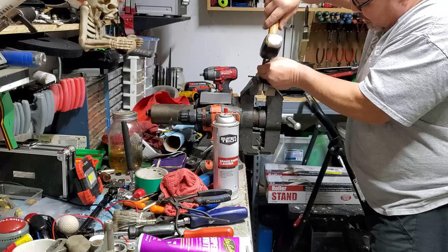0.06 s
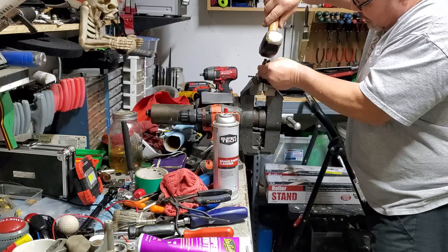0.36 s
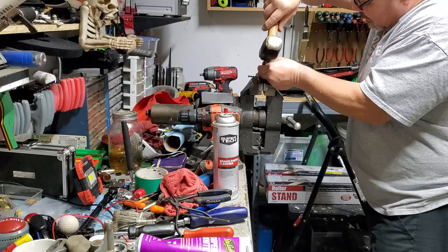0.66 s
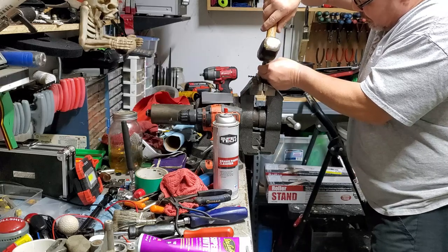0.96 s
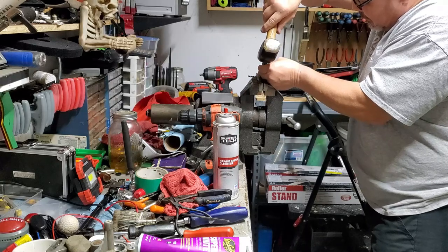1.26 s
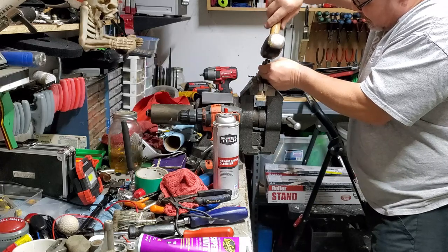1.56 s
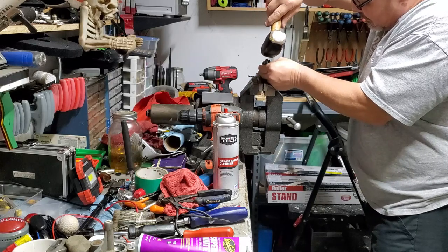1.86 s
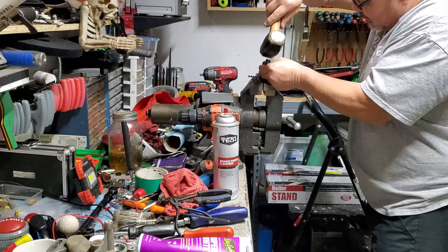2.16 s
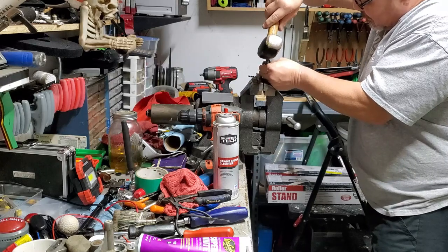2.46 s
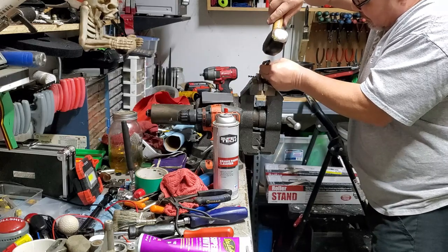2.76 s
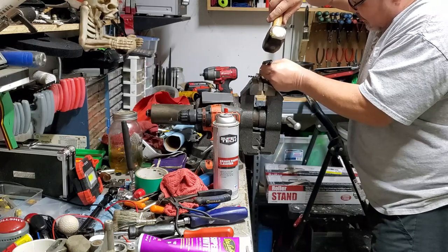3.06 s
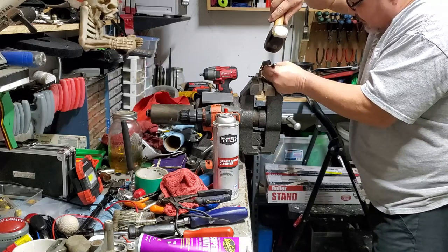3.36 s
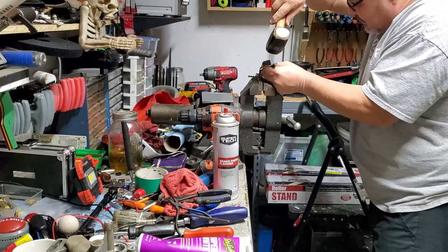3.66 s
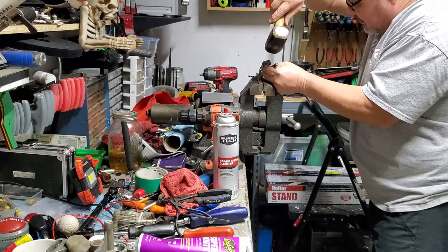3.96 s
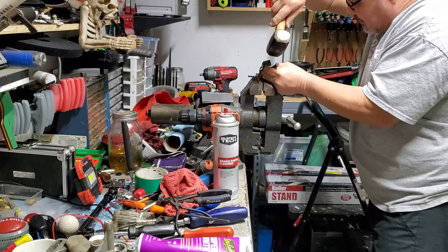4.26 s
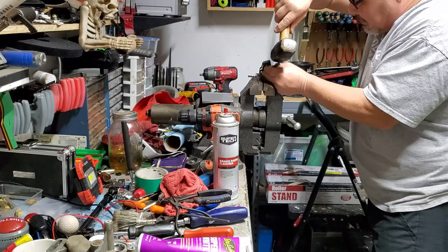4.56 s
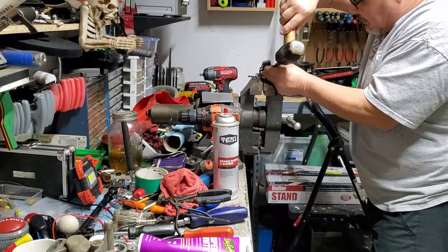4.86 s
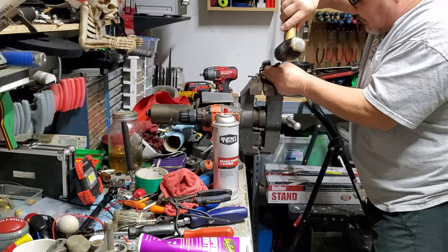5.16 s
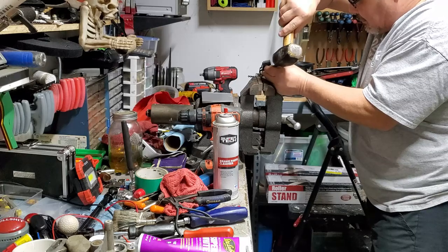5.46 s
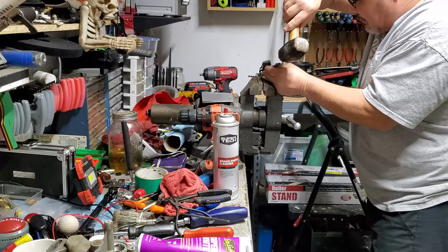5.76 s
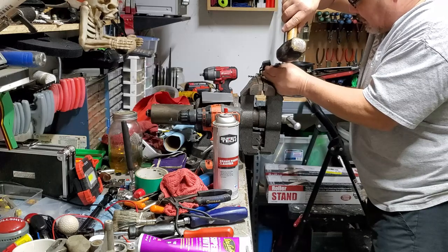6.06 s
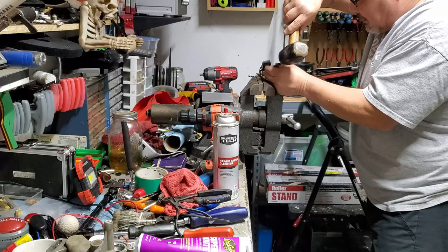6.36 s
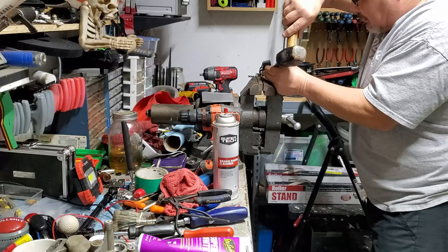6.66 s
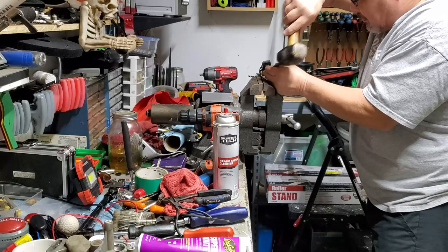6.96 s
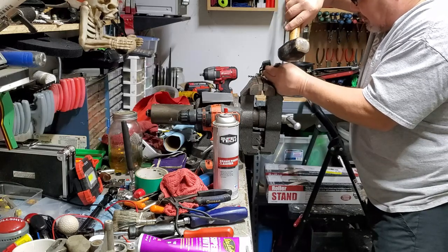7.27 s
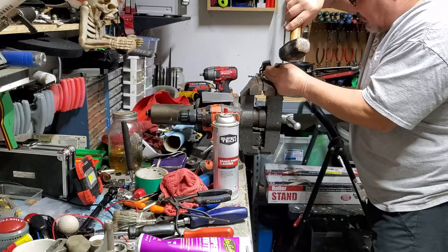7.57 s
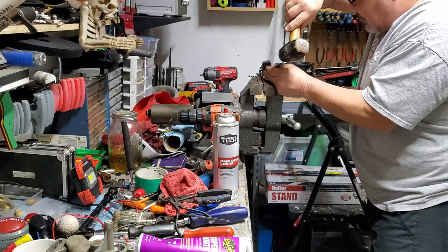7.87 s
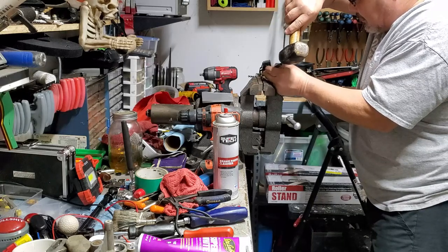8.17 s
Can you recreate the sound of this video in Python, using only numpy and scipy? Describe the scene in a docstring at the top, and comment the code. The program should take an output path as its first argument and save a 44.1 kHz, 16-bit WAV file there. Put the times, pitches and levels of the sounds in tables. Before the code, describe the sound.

A hammer taps a heavy metal housing clamped to a bench in a small workshop, heard in stereo from nearby. From about 0.2 to 2.4 seconds, seven sharp blows land evenly, nearly three a second. Each cracks, rings briefly, thumps the bench and lightly rattles loose tools, with a short room echo. A pause follows, with faint clinks of handled metal around 2.7, 3.2 and 4.6 seconds. At 5 and 5.5 seconds come two duller knocks, each with a high ping, followed by more small clinks. A weak tap lands at 6.6 seconds and a hard, ringing blow at 7. One last tiny clink comes near 7.8 seconds. Underneath throughout are quiet room air, a low motor hum and a faint distant drone that swells slightly between 5 and 6.5 seconds.

```python
"""A small, crowded workshop, heard through a stereo microphone near the bench.
Over room air, a motor's hum and a far-off drone, a hammer taps a heavy metal housing clamped to the bench.
Seven quick blows come first: each cracks, rings the housing, thumps the bench and shakes loose tools,
and the room answers. In the pause the metal clinks faintly in the hand and a thin whine comes and goes.
From 5 s four more blows follow, unevenly spaced, the third one weak; a last faint clink ends the work."""
import sys
import numpy as np
from scipy import signal
from scipy.fft import rfft, irfft, next_fast_len
from scipy.io import wavfile
from scipy.ndimage import map_coordinates

SR = 44100
rng = np.random.default_rng(int(sys.argv[2]) if len(sys.argv) > 2 else 0)


def int16_out(signal):
    """Quantize to a 16-bit WAV file."""
    q = np.round(np.clip(np.atleast_2d(signal).T, -1, 1) * 32767)
    wavfile.write(sys.argv[1], SR, q.astype(np.int16))


N = 362943
T = np.arange(int(.6 * SR)) / SR  # time within one impact [s]

# hammer blows: (time [s], force [dB], clang over the force [dB], ping pitch [Hz], ping level [dB])
BLOWS = [(.1580, -1, -3.5, 3730, -3.5), (.5343, -.5, -7.5, 3720, -5), (.9303, 1, -2, 3730, 1.5),
         (1.2903, 0.5, -4, 3746, 7.5), (1.6796, 1, -1.5, 3670, 3), (2.0432, 1, -2, 2914, 2.5),
         (2.4, 1.5, -3.5, 3736, -2), (5.0057, -1.5, -19.5, 5040, -2), (5.4844, 2.5, -21, 5100, 1.5),
         (6.5559, -20.5, -4.5, 3506, -10), (7.0452, 4, -8.5, 4197, 7)]
# modes of the bench and vise: (frequency [Hz], energy [dB], t60 [s])
BENCH_MODES = [(181.7, -10, 0.16), (217.4, -6.5, .24), (258, -19, .28), (324, -3.5, 0.17), (350.8, -7, .42),
               (459.5, 3.5, 0.2), (557.1, -7.5, 0.16), (624, -4, 0.079), (712, -5.5, .16), (830, -7, 0.067),
               (1045.4, -7.5, 0.12)]
# the dry knock of the whole assembly: (frequency [Hz], level [dB])
KNOCK_SPECTRUM = [(60, -18.5), (200, -3), (480, 1), (1000, -3.5), (1650, -8), (2700, -4), (5200, -11),
                  (7000, -14), (9200, -25), (11000, -23), (13500, -24), (15500, -23)]
# the room's echoes at the microphone: (frequency [Hz], left-right likeness [-1..1])
ECHO_LIKENESS = [(150, 0.94), (400, 0.46), (900, 0.061), (3000, 0.13)]


def amp(db):
    """Decibels to gain."""
    return 10 ** (np.asarray(db) / 20)


def unit(x):
    """Scaled to rms 1."""
    return x / np.sqrt(np.mean(x ** 2) + 1e-20)


def unit_energy(x):
    """Scaled to a mean energy of 1 per channel."""
    return unit(x) / np.sqrt(x.shape[-1])


def along(points, hz):
    """(Hz, value) points read on a log axis."""
    freqs, values = np.transpose(points)
    return np.interp(np.log(hz + 1), np.log(freqs + 1), values)


def curve(points):
    """(s, value) points read at every sample."""
    return np.interp(np.arange(N) / SR, *np.transpose(points))


def wobble(rate):
    """A smooth random curve, rate knots a second."""
    return map_coordinates(rng.standard_normal(int(N * rate / SR) + 4), [np.arange(N) * rate / SR])


def tone(hz, waver_hz, waver_rate=12):
    """An unsteady sine of rms 1."""
    return unit(np.sin(2 * np.pi * np.cumsum(hz + waver_hz * wobble(waver_rate)) / SR))


def swelling(rows, fade_s):
    """A gain that fades in, holds and fades out for each (time [s], length [s], level [dB]) row."""
    t = np.arange(N) / SR
    return sum(amp(db) * np.clip(np.minimum(t - s, s + length - t) / fade_s, 0, 1)
               for s, length, db in rows)


def filtered(x, response):
    """x times a response of frequency."""
    n = x.shape[-1]
    size = next_fast_len(n + 8192)
    return irfft(rfft(x, size) * response(np.fft.rfftfreq(size, 1 / SR)), size)[..., :n]


def coloured(x, spectrum):
    """x through a causal (minimum-phase) filter with these (Hz, dB) points."""
    size = 2 * next_fast_len(x.shape[-1])
    gain = amp(along(spectrum, np.fft.rfftfreq(size, 1 / SR)))
    cepstrum = irfft(np.log(gain), size)
    cepstrum[1:size // 2] *= 2
    cepstrum[size // 2 + 1:] = 0
    return irfft(rfft(x, size) * np.exp(rfft(cepstrum)), size)[..., :x.shape[-1]]


def noise_pair(size=len(T), likeness=ECHO_LIKENESS):
    """White stereo noise with a given likeness of the channels."""
    def mid_side_gains(hz):
        angle = np.arccos(np.clip(along(likeness, hz), -1, 1)) / 2
        return np.array([np.cos(angle), np.sin(angle)])
    mid, side = filtered(rng.standard_normal((2, size)), mid_side_gains)
    return np.array([mid + side, mid - side])


def add(track, s, sound):
    """Mix a sound into the track at s seconds."""
    part = track[:, max(round(s * SR), 0):][:, :sound.shape[-1]]
    part += sound[:, :part.shape[-1]]


def ring(modes, rise_s, scatter_db, lag_s):
    """Decaying modes at fresh strengths, their phase lag_s earlier on the left than on the right."""
    out = np.zeros((2, len(T)))
    for hz, db, t60 in modes:
        t = T[T < 1.5 * t60]
        phase = rng.uniform(0, 2 * np.pi) + np.array([[1], [-1]]) * np.pi * hz * lag_s
        envelope = amp(-60 * t / t60) * (1 - np.exp(-t / rise_s))
        mode = unit_energy(np.sin(2 * np.pi * hz * t + phase) * envelope)
        out[:, :len(t)] += amp(db + scatter_db * rng.normal()) * mode
    return out


def wash(noise, spectrum, rise_s):
    """Countless modes and echoes, each frequency dying at its own speed."""
    # decay of the small room: (frequency [Hz], t60 [s])
    room_t60 = [(150, 0.46), (800, 0.35), (3000, 0.29), (7000, .3), (10000, .22), (15000, .21)]
    hz, t, bands = signal.stft(noise, SR, nperseg=256)
    decay = amp(-60 * t / along(room_t60, hz)[:, None])
    tail = signal.istft(bands * decay, SR, nperseg=256)[1][:, :len(T)]
    return unit_energy(coloured(tail * (1 - np.exp(-T / rise_s)), spectrum))


def room_tone(air_db=-58, hiss_db=-77.3):
    """The steady low air of the workshop under a faint hiss."""
    # room air: (frequency [Hz], relative level [dB])
    air = [(12, -58), (20, -23), (43, -11.5), (65, -18), (86, -9), (120, -11), (149, -19.5), (188, -16.5),
           (265, -17), (312, -20.5), (1500, -41), (1950, -75.5), (3300, -120)]
    # hiss: (frequency [Hz], relative level [dB])
    hiss = [(900, -15), (1700, 1), (3000, 1), (3850, 1.5), (5000, -4), (6500, 0), (8800, -14), (11000, -14),
            (12500, -6), (15700, -6)]
    # both at the microphone: (frequency [Hz], left-right likeness [-1..1])
    likeness = [(60, 0.32), (240, -0.14), (950, -0.23), (3770, 0.87), (15000, -0.01)]
    def steady(spectrum):
        return unit(filtered(noise_pair(N, likeness), lambda hz: amp(along(spectrum, hz))))
    return amp(air_db) * steady(air) + amp(hiss_db) * steady(hiss)


def motor_hum(hz=58.8, level_db=-54):
    """A motor hums low, its level and pitch wavering."""
    return amp(level_db + 2.5 * wobble(18)) * tone(hz, waver_hz=2.5)


def far_drone(gain_db=-1, upper_ratio=1.37, upper_db=-4, swell_hz=157):
    """Two far-off tones drop once in pitch and climb back; a lower one swells twice within them."""
    # the lower of the two tones: (time [s], frequency [Hz])
    pitch = [(3.3, 188), (4.2, 193), (4.6, 178), (5.6, 185), (6.1, 194)]
    # the drone's rise and fall: (time [s], level [dB])
    levels = [(0.0, -68), (2.34, -59), (2.84, -71), (3.71, -59.5), (4.24, -65), (5.09, -55), (5.87, -54),
              (6.21, -59.5), (8.23, -67.5)]
    # the low swells: (time [s], length [s], level [dB])
    swells = [(6.13, 0.42, -50), (7.74, 0.37, -65.5)]
    lower_hz = curve(pitch)
    tones = tone(lower_hz, waver_hz=2) + amp(upper_db) * tone(upper_ratio * lower_hz, waver_hz=4)
    drone = amp(gain_db + curve(levels) + 1.5 * wobble(8)) * tones
    return drone + swelling(swells, fade_s=.097) * tone(swell_hz, waver_hz=.67)


def whine(hz=3900):
    """A thin, fuzzy high tone comes and goes at the edge of hearing."""
    # spells of the whine: (time [s], length [s], level [dB])
    spells = [(4.35, .33, -85), (7.35, 0.39, -82.5)]
    fuzzy = tone(hz, waver_hz=70, waver_rate=300)
    return swelling(spells, fade_s=.083) * amp(2.24 * wobble(25)) * fuzzy


def hand_clinks(gain_db=15, ring_hz=2120, detune=.07, ring_db=-11, t60=.12, chink_hz=5250, bench_db=-6):
    """Metal shifts in the hand: each touch knocks and clinks in its own proportions."""
    # light touches of metal on the housing: (time [s], relative level [dB], high chink [dB])
    touches = [(1.588, -45.5, -20.5), (2.685, -44.5, -18.5), (2.724, -47.5, 0), (3.238, -44.5, -20),
               (4.585, -43, -13.5), (4.709, -49.5, -14), (5.324, -51, -18), (5.743, -49, -18.5),
               (5.945, -42.5, -8.5), (7.788, -53, -18)]
    out = np.zeros((2, N))
    for s, db, chink_db in touches:
        clink = wash(noise_pair(), KNOCK_SPECTRUM, rise_s=.00092) * amp(-60 * T / .5)
        hz = ring_hz * np.exp(detune * rng.normal())  # each touch lands on another spot
        modes = [(hz, ring_db, t60), (chink_hz, chink_db, t60)]
        clink += ring(modes, rise_s=.001, scatter_db=3, lag_s=.0001)
        clink += amp(bench_db) * ring(BENCH_MODES, rise_s=.004, scatter_db=2, lag_s=.0005)
        add(out, s, amp(db + gain_db) * coloured(clink, [(5500, 1), (12000, -11)]))
    return out


def tool_rattle(gain_db=-20, delay_s=(.11, .19), fade_db_per_s=55, detune=.035, contacts=7):
    """Tools lying on the bench jump at each blow and settle in small, unlike contacts."""
    # modes of the loose tools: (frequency [Hz], energy [dB], t60 [s])
    tool_modes = [(760, -7, .13), (1340, -7, .1), (2100, -1, .13), (3100, -5, .12), (4100, -10, .12)]
    out = np.zeros((2, N))
    for s, force_db, clang_db, *_ in BLOWS:
        for delay in rng.uniform(*delay_s, contacts):
            modes = [(hz * np.exp(detune * rng.normal()), db, t60) for hz, db, t60 in tool_modes]
            contact = ring(modes, rise_s=.00084, scatter_db=3.5, lag_s=.00019)
            level_db = gain_db + force_db + clang_db / 2 - fade_db_per_s * delay
            add(out, s + delay, amp(level_db) * contact)
    return out


def echoes(paths, shared=.75):
    """Echo noise, much the same for every blow: the fixed paths plus a fresh part."""
    return np.sqrt(shared) * paths + np.sqrt(1 - shared) * noise_pair()


def bench_knock(room_paths, clutter_paths, force_db, clang_db, wash_db=5, snap_db=3, snap_t60=.07):
    """Hammer head and bench knock together; the first echoes snap back from the clutter on the bench."""
    # modes of the steel hammer head: (frequency [Hz], energy [dB], t60 [s])
    head_modes = [(10560, -23, .12), (14490, -21, .1), (14638, -20, .23)]
    knock = amp(wash_db) * wash(echoes(room_paths), KNOCK_SPECTRUM, rise_s=.00082)
    snap = echoes(clutter_paths) * amp(-60 * T / snap_t60)
    knock += amp(snap_db) * unit_energy(coloured(snap, KNOCK_SPECTRUM))
    knock += ring(head_modes, rise_s=.001, scatter_db=.5, lag_s=.00007)
    knock += ring(BENCH_MODES, rise_s=.004, scatter_db=.5, lag_s=.00029)
    thud_db = -4 + .2 * force_db - .4 * clang_db  # takes up what does not clang
    boom_db = 1.5 + .61 * force_db + .2 * clang_db  # follows the force and likes a square hit
    return coloured(knock, [(220, boom_db), (450, thud_db), (650, thud_db), (1200, force_db)])


def crack(spread_s=.0003):
    """Steel meets steel for a millisecond or two; nearby surfaces throw the crack back."""
    # heavily damped modes of the contact: (frequency [Hz], energy [dB], t60 [s])
    contact_modes = [(2575, 0.5, 0.005), (2977, -1, 0.0042), (3878, 2, .009), (5970, -10.5, .008),
                     (7100, -12.5, .008), (11734, -21.5, 0.015), (15000, -22, .009)]
    # reflections from nearby surfaces: (delay [s], level [dB])
    reflections = [(.0052, -7.5), (.011, -8.5), (0.0117, -11)]
    direct = ring(contact_modes, rise_s=.002, scatter_db=1, lag_s=0)
    out = direct.copy()
    for delay, db in reflections:
        for side in (slice(0, 1), slice(1, 2)):  # left, right
            add(out[side], delay + spread_s * rng.normal(), amp(db) * direct[side])
    return out


def housing_clang(paths, crack_db=5.5, wash_db=9, modes_db=-1):
    """The housing cracks under the hammer and rings on into the room."""
    # distinct modes of the housing: (frequency [Hz], energy [dB], t60 [s])
    housing_modes = [(2500, -2, 0.14), (2780, -4, .16), (2880, -2, 0.26), (3100, -6.5, 0.17),
                     (3298, -7.5, 0.17), (3520, -2.5, 0.18), (3627, 1.5, 0.1), (4020, -3, 0.27),
                     (4050, -3, .2), (4440, -12.5, .25), (5850, -8, 0.19), (6730, -3.5, 0.14),
                     (6720, -5.5, 0.17), (6900, -8, .24), (7870, -13.5, .2)]
    # its dense upper modes: (frequency [Hz], level [dB])
    dense_modes = [(1500, -38), (2300, -10.5), (2900, -1.5), (3350, -2), (3850, 1.5), (4600, -18.5),
                   (5700, -14.5), (6750, -4), (7900, -12), (9600, -31), (11700, -14.5), (13500, -23.5),
                   (14600, -20), (15600, -14.5)]
    clang = amp(crack_db) * crack() + amp(wash_db) * wash(echoes(paths), dense_modes, rise_s=.002)
    return clang + amp(modes_db) * ring(housing_modes, rise_s=.001, scatter_db=.5, lag_s=.00031)


def spot_ping(hz, db, t60=.16):
    """The struck spot rings with a close cluster of three modes."""
    cluster = [(hz * ratio, db - 7.5, t60) for ratio in (.985, 1, 1.015)]
    return ring(cluster, rise_s=.0008, scatter_db=0, lag_s=.00003)


def hammer():
    """The blows: a square hit sets the housing clanging, a damped one mostly thuds through the bench."""
    out = np.zeros((2, N))
    knock_paths, clang_paths, clutter_paths = (noise_pair() for _ in range(3))
    for s, force_db, clang_db, ping_hz, ping_db in BLOWS:
        add(out, s, bench_knock(knock_paths, clutter_paths, force_db, clang_db))
        add(out, s, amp(force_db + clang_db) * housing_clang(clang_paths))
        add(out, s, spot_ping(ping_hz, ping_db))
    return out


def scene(left_db=1):
    """The workshop from the microphone's place, a little stronger on the left."""
    bench_work = hammer() + tool_rattle() + hand_clinks()
    background = motor_hum() + far_drone() + room_tone() + whine()
    return (bench_work + background) * amp([[left_db], [-left_db]])


def record(dry, ceiling=.92, top_hz=15780):
    """The microphone chain rounds off the highest peaks and keeps nothing above its band limit."""
    rounded = dry / (1 + np.abs(dry / ceiling) ** 8) ** (1 / 8)
    return filtered(rounded, lambda hz: 1 / np.sqrt(1 + (hz / top_hz) ** 300))


dry = scene()
out = record(dry)
int16_out(out)
```